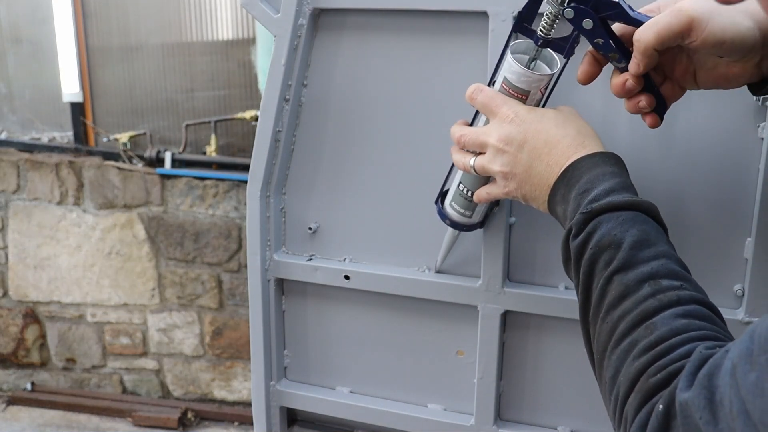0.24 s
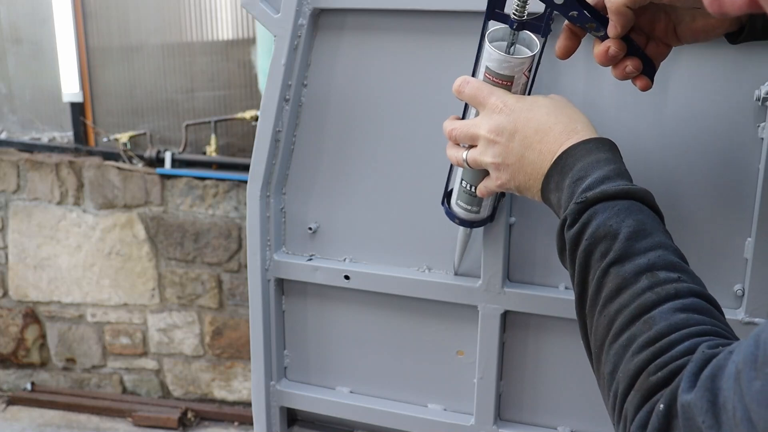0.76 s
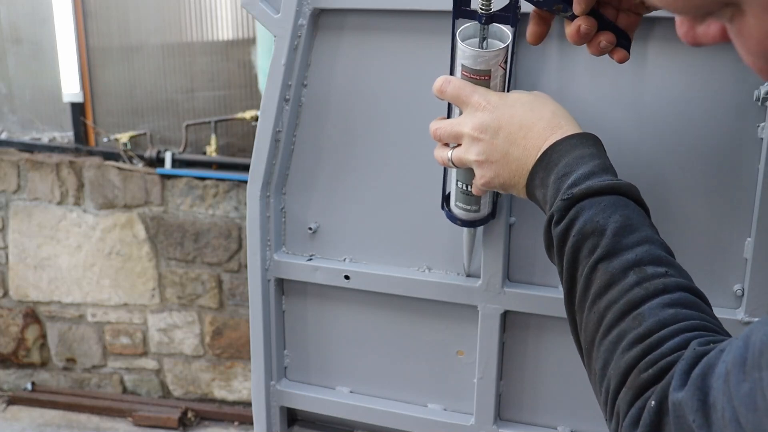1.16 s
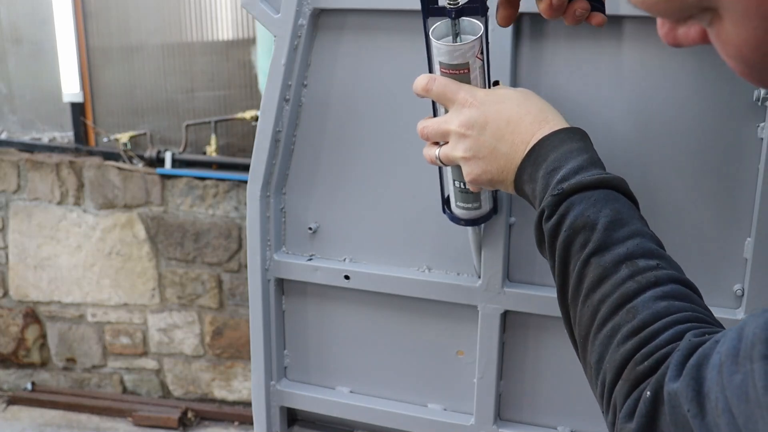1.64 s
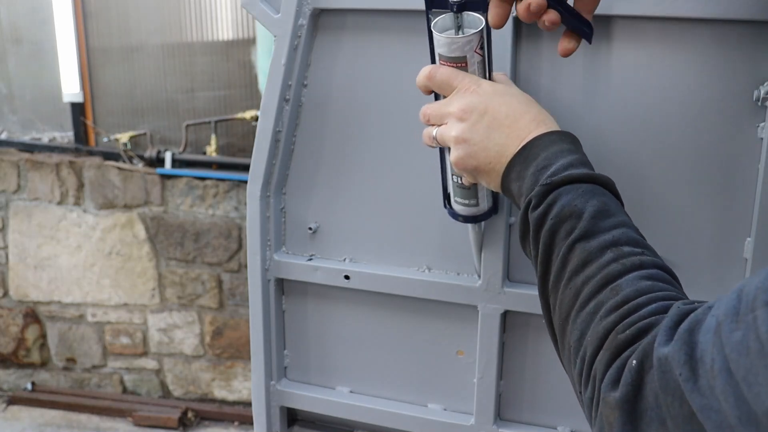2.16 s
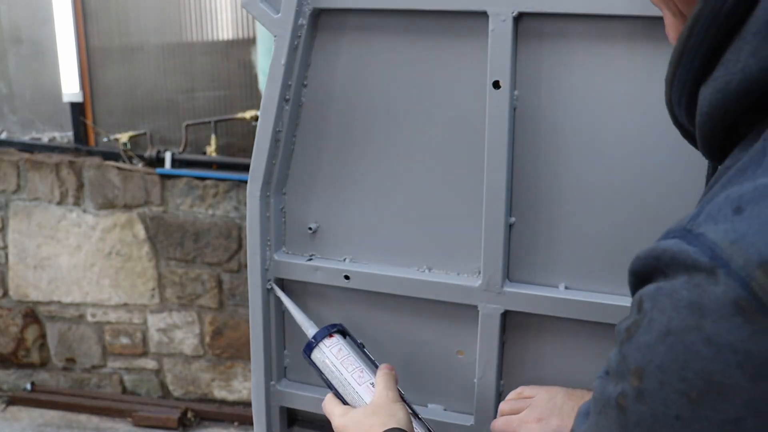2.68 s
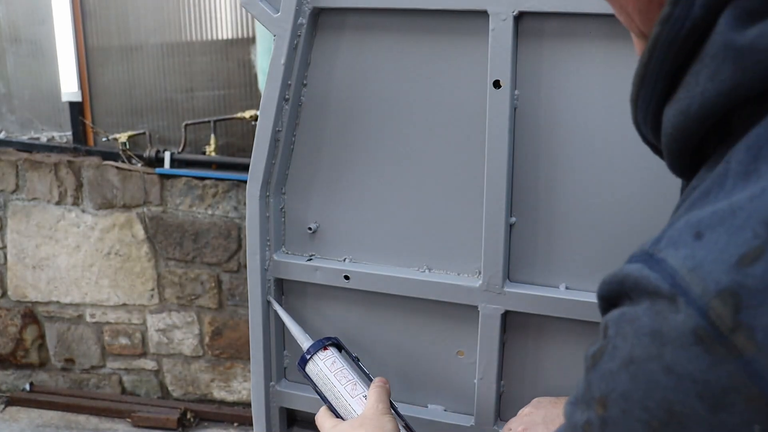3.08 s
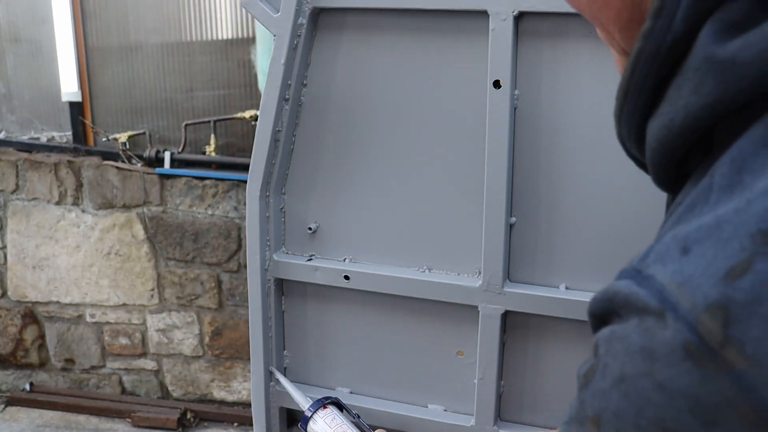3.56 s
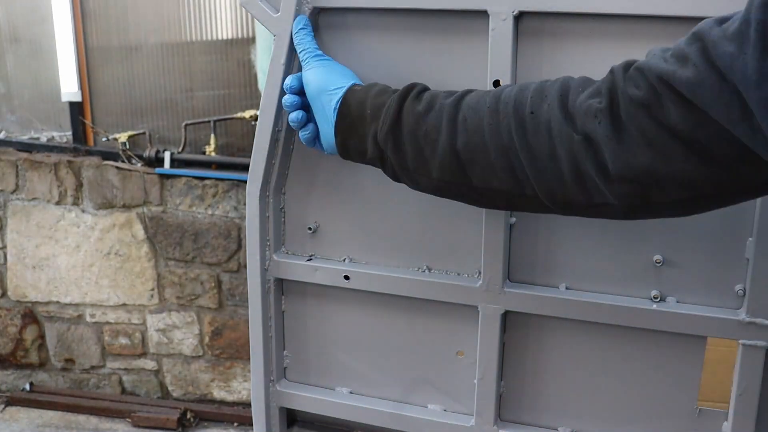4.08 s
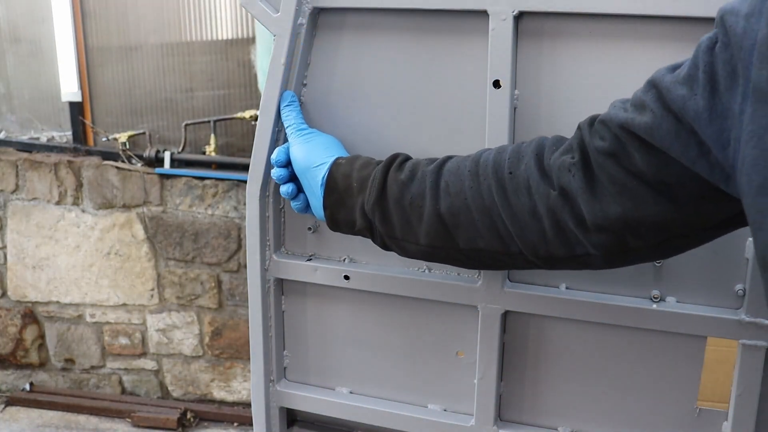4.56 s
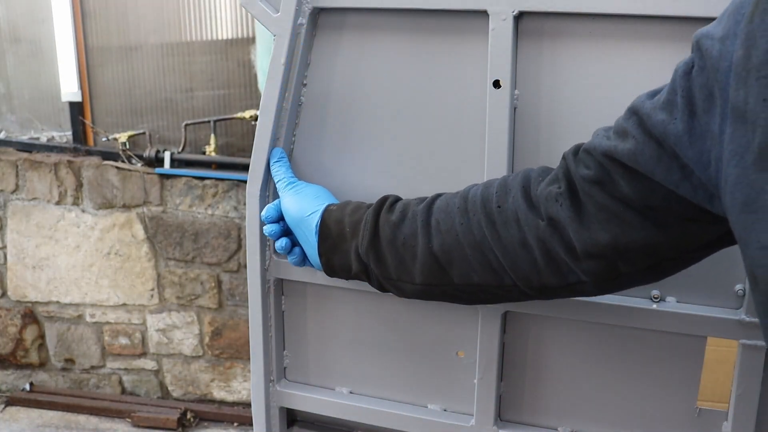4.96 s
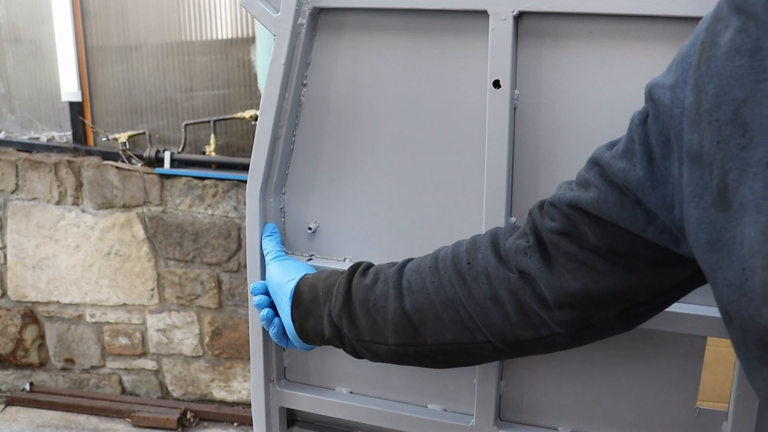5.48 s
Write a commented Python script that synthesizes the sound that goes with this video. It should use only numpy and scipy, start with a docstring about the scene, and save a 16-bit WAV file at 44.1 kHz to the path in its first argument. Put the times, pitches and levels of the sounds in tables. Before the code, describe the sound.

Close to the microphone in a workshop, a caulking gun clicks sharply and bumps a steel panel with short boomy knocks at the start. Sleeve swishes and dull rubbing follow, then a louder cluster of clatter and knocks around two seconds. A quieter stretch leads to a brief run of clicks, and finally soft rustles and tiny squeaky glove scrapes. A faint breathy fan whine and low rumble continue throughout.

```python
"""In a workshop, a caulking gun lays sealer along the seams of a painted steel panel, close to the microphone.
Contact noise rings the gun's frame, cartridge and struck parts; knocks of the nozzle ring the panel's modes.
A gloved thumb catches in short scrapes of resonant noise; a sleeve rustles and a hand rubs as shaped noise.
Behind them a fan's faint, breathy whine is noise around a broad resonance, over a low rumble."""
import sys
import numpy as np
from scipy import signal
from scipy.fft import rfft, irfft
from scipy.io import wavfile
from scipy.ndimage import uniform_filter1d

SR = 44100
rng = np.random.default_rng(int(sys.argv[2]) if len(sys.argv) > 2 else 0)


def generate_wav(sig):
    """Save sig (samples, or channels by samples) to the path in sys.argv[1] as 16-bit PCM at SR."""
    pcm = np.round(np.clip(np.atleast_2d(sig).T, -1, 1) * 32767).astype(np.int16)
    wavfile.write(sys.argv[1], SR, pcm)


N = 252252
TIME = np.arange(N) / SR  # s
HIT_TIME = TIME[:SR // 3]  # time axis of one short sound, s
TOP_HZ = 15800  # upper band limit


def amp(db):
    """Logarithmic level: decibels become an amplitude gain."""
    return 10 ** (np.asarray(db) / 20)


def unit(x):
    """Normalisation: scale to an rms of one."""
    return x / np.sqrt(np.mean(x ** 2))


def burst(x, db):
    """Sound exposure: give a short sound the energy of 10 ms at this level."""
    return x * amp(db) * np.sqrt(SR / 100 / np.sum(x ** 2))


def curve(table):
    """Linear interpolation: join (t/s, level/dB) points by straight lines."""
    t, level_db = np.transpose(table)
    return np.interp(TIME, t, level_db)


def colour(x, spectrum):
    """Spectral shaping: filter by (f/Hz, level/dB) points, to an rms of one."""
    hz, db = np.transpose(spectrum)
    f = np.maximum(np.fft.rfftfreq(len(x), 1 / SR), 1)
    gain = amp(np.interp(np.log(f), np.log(hz), db))
    return unit(irfft(rfft(x) * gain, len(x)))


def noise():
    """White noise: equal mean power at every frequency."""
    return rng.standard_normal(N)


def walk(rate):
    """Random modulation: smooth chance of rms one, with a new target rate times a second."""
    k = int(SR / rate)
    steps = np.repeat(rng.standard_normal(N // k + 1), k)
    return unit(uniform_filter1d(steps, k)[:N])


def resonate(x, hz, width):
    """Resonance: one damped mode of a given bandwidth driven by x, at an rms of one."""
    return unit(signal.lfilter(*signal.iirpeak(hz, hz / width, fs=SR), x))


def rung(force, modes):
    """Modal superposition: one force drives all modes; neighbours have opposite signs."""
    total = 0
    for k, (hz, width, db) in enumerate(modes):
        total = total + amp(db) * (-1) ** k * resonate(force, hz, width)
    return unit(total)


def lowpass(x, hz, order=2):
    """Low-pass filtering: attenuate what lies above hz."""
    return signal.sosfilt(signal.butter(order, hz, fs=SR, output="sos"), x)


def contact(length_s, fall_s):
    """Rough contact: a random force builds, holds, then decays exponentially."""
    build = np.minimum(3 * HIT_TIME / length_s, 1)
    release = np.exp(-np.maximum(HIT_TIME - length_s, 0) / fall_s)
    return rng.standard_normal(len(HIT_TIME)) * build * release


def chatter(length_s, fall_s, count=6):
    """Broadband excitation: a flurry of hard impacts, flattened in spectrum and faded count times."""
    force = contact(length_s, fall_s)
    fade = np.exp(-np.maximum(HIT_TIME - length_s - 2 * fall_s, 0) / fall_s)
    for _ in range(count):
        phase = np.angle(rfft(force))
        force = irfft(np.exp(1j * phase), len(force)) * fade
    return force


def add(track, s, sound):
    """Linear superposition: mix a sound into the track at time s."""
    i = max(int(s * SR), 0)
    track[i:i + len(sound)] += sound[:N - i]


# slowly drifting whine of the fan: t/s, level/dB before its random flutter
FAN_LEVEL = [(0, -34.5), (.9, -36), (1.7, -36), (2.7, -37), (3.95, -41.5), (4.35, -39.5), (5.72, -39)]
# broad resonance of the moving air: f/Hz, relative level/dB per Hz
WHINE_SPECTRUM = [(500, -25.5), (700, -13.5), (800, -6), (900, -2), (980, -4.5), (1100, -11), (1400, -16),
                  (2000, -24), (4000, -51)]
# low rumble of the shop: f/Hz, relative level/dB per Hz
RUMBLE_SPECTRUM = [(15, -10), (40, -2.5), (130, 1), (500, -2), (1500, -8.5), (3000, -14.5), (6000, -45),
                   (16000, -54)]


def fan(flutter_db=0.65, flutter_hz=8.2, rumble_db=-45):
    """Flow-excited resonance: moving air rings a broad resonance, over the low rumble of the shop."""
    air = colour(noise(), WHINE_SPECTRUM)
    whine = air * amp(curve(FAN_LEVEL) + flutter_db * walk(flutter_hz))
    rumble = amp(rumble_db) * colour(noise(), RUMBLE_SPECTRUM)
    return whine + rumble


# how hard the hands work along the seam: t/s, level/dB of their rub before its unevenness
EFFORT = [(0, -40), (1.2, -41), (1.75, -44), (2.25, -40), (2.8, -41.5), (3.45, -46.5), (4.0, -47),
          (4.27, -44), (4.6, -44), (5.25, -39.5), (5.72, -40.5)]
# dull friction on steel: f/Hz, relative level/dB per Hz
RUB_SPECTRUM = [(30, -5), (100, -2.5), (180, -2.5), (320, -1), (500, -8), (700, -8.5), (1200, -19),
                (3000, -43.5)]


def hand(uneven_db=1.1, uneven_hz=19):
    """Sliding friction: hand and nozzle drag along the steel with a dull, uneven rub."""
    friction = colour(noise(), RUB_SPECTRUM)
    return friction * amp(curve(EFFORT) + uneven_db * walk(uneven_hz))


# swishes of the sleeve, one per move of the arm: middle t/s, level/dB before the cloth gain,
# length above half power/s
SWISHES = [(0.245, -47.5, 0.037), (.39, -45.5, 0.093), (.575, -46, 0.077), (0.66, -43.5, 0.025),
           (0.72, -52, .04), (0.852, -60, .05), (1.02, -45.5, 0.1), (1.221, -38.5, 0.036),
           (1.27, -41.5, .08), (1.385, -52, .08), (1.63, -49.5, 0.04), (2, -43, 0.063), (2.418, -45, 0.045),
           (2.556, -41, 0.098), (2.644, -44, 0.047), (2.728, -46, 0.048), (2.917, -43, 0.082),
           (4.814, -48, .13), (5.008, -45, 0.075), (5.117, -50, 0.061), (5.363, -48.5, 0.097),
           (5.47, -43, 0.06), (5.65, -48, 0.15)]


def arm(creep_db=-51.5, creep_growth=1.1, usual_effort_db=-42):
    """Power addition: the cloth creeps as the hands work (EFFORT) and swells with each swish; level in dB."""
    creep = amp(creep_db + creep_growth * (curve(EFFORT) - usual_effort_db))
    power = creep ** 2
    for middle_s, db, length_s in SWISHES:
        swell = np.exp2(-(2 * (TIME - middle_s) / length_s) ** 2)  # the arm speeds up and slows down
        power = power + amp(db) ** 2 * swell
    return 10 * np.log10(power)


# rustle of the cloth: f/Hz, relative level/dB per Hz
CLOTH_SPECTRUM = [(400, -1), (1000, 1), (1500, 1), (2200, -1.5), (2900, -1), (3500, 2), (4300, -2.5),
                  (5100, -2), (6500, -9.5), (9000, -13.5), (16000, -27)]
# bright hiss of the cloth: f/Hz, relative level/dB per Hz
HISS_SPECTRUM = [(3000, -30), (6000, 5), (8000, 3.5), (10000, 2), (12500, 5.5), (16000, 1)]


def sleeve(cloth_gain_db=2.5, hiss_db=-53.5, hiss_growth=1.17, usual_swish_db=-45.5,
           grain_db=1.5, flutter_db=1.03):
    """Stick-slip friction: countless fibres catch and slip; faster cloth hisses more brightly."""
    motion_db = arm()
    slips = amp(grain_db * walk(900) + flutter_db * walk(35))
    rustle = colour(noise() * slips, CLOTH_SPECTRUM) * amp(motion_db + cloth_gain_db)
    hiss_level_db = hiss_db + hiss_growth * (motion_db - usual_swish_db)
    hiss = colour(noise() * slips, HISS_SPECTRUM) * amp(hiss_level_db)
    return rustle + hiss


# the gloved thumb catching as it smooths the bead: t/s, level/dB (energy of 10 ms), length/s, f/Hz
SCRAPES = [(5.305, -40.5, 0.02, 3600), (5.377, -39, 0.011, 3630), (5.438, -44, 0.0077, 3400),
           (5.476, -44.5, 0.0044, 5300), (5.602, -48, .012, 4600), (5.672, -40, 0.012, 2540)]


def thumb(width_hz=700, fall_s=0.0043):
    """Stick-slip resonance: rubber catches on the painted edge in short, gritty scrapes."""
    out = np.zeros(N)
    for s, db, length_s, hz in SCRAPES:
        scrape = resonate(contact(length_s, fall_s), hz, width_hz)
        add(out, s, burst(scrape, db))
    return out


# knocks on the panel: t/s, level/dB (energy of 10 ms), contact time scale/s,
# hardness as the corner of the drive f/Hz, boom of the lowest modes/dB
KNOCKS = [(0.042, -18.5, 0.0086, 470, -3), (0.108, -23, 0.015, 450, 11), (0.141, -18, 0.023, 500, 7.5),
          (0.3788, -19.5, 0.002, 800, 8.5), (0.656, -26.5, 0.012, 523, 0), (1.065, -31.5, 0.0054, 450, 7),
          (1.2584, -29, 0.0093, 480, 9), (1.8635, -20.5, 0.023, 464, 5), (2.1808, -19, 0.0039, 440, 6),
          (2.2217, -14.5, 0.0033, 3800, 0), (2.239, -18, 0.0081, 1500, -18), (2.28, -26, 0.044, 477, 4)]
# modes of the ribbed panel: f/Hz, bandwidth/Hz, relative level/dB before hardness and boom
PANEL_MODES = [(126, 15, -22), (156.3, 8.3, -5.5), (197, 29, 1), (232, 6.4, -9.5), (331, 3.3, -5),
               (358.4, 12.5, 5.5), (406, 13, -0.5), (477, 29, 4), (516, 23, -5), (619, 77, -1.5),
               (783, 8.7, -3), (861, 22, 7.5), (946, 120, -2), (1142, 57, 1.5), (1316, 140, -2.5),
               (1620, 190, -24), (2000, 160, -9), (3650, 83, 1), (5030, 270, 0)]


def panel(shudder_db=-14, shudder_s=0.025, boom_hz=260, blow_db=-1, blow_s=0.00059):
    """Modal excitation: the nozzle bumps the panel, which shudders; soft contact favours low modes."""
    out = np.zeros(N)
    blow = np.exp(-HIT_TIME / blow_s)
    for s, db, contact_s, hard_hz, boom_db in KNOCKS:
        ring = 0
        for hz, width, mode_db in PANEL_MODES:
            # a firm blow starts the mode; sliding contact keeps it going
            slide = contact(contact_s / 2, contact_s)
            shudder = amp(shudder_db) * contact(contact_s, shudder_s)
            cutoff = min(2 * hz, TOP_HZ)
            struck = resonate(lowpass(blow, cutoff), hz, width)
            rubbed = resonate(lowpass(slide + shudder, cutoff), hz, width)
            mode = unit(amp(blow_db) * rng.choice([-1, 1]) * struck + rubbed)
            softness = np.hypot(1, (hz / hard_hz) ** 2)
            ring = ring + amp(mode_db + boom_db * (hz < boom_hz)) / softness * mode
        add(out, s, burst(ring, db))
    return out


# clicks and scrapes of the gun: t/s, level/dB (energy of 10 ms), contact time scale/s,
# struck part f/Hz, its ring/dB re frame, treble tilt/dB at the band limit, cartridge ring/dB re frame
CLICKS = [(0.0988, -16, 0.0025, 3150, -7.5, -2, -16.5), (0.174, -50, .002, 4700, -6, -5, -15),
          (1.8554, -29.5, 0.0082, 3750, -5, -13, -5.5), (1.964, -27.5, 0.014, 7400, 0, 16, -19),
          (1.977, -32.5, 0.015, 7480, -4, 9, -20), (2.018, -40.5, 0.014, 5200, -6, 0, -15),
          (2.1755, -17.5, .0048, 4800, -2.5, 2.5, -3), (2.221, -23.5, 0.014, 2700, -15, -13, 6),
          (2.2655, -29, 0.0041, 3250, -18, -21, -7), (2.393, -44, 0.0014, 7660, -26, 1, -13),
          (3.1808, -42.5, 0.0031, 3100, 3, -2, 4), (3.224, -41, 0.0013, 11000, -14, 1, 4),
          (3.2777, -38.5, .002, 2710, 5, -5, -6), (3.7766, -28.5, 0.017, 2180, -6, -8, -13),
          (3.7861, -26.5, 0.0128, 3840, -7, -7, -1.5), (3.7960, -28, 0.0044, 1870, -2, 0, -5),
          (3.7991, -27, 0.00022, 8500, -8, 4, -18), (3.85, -42, 0.0067, 3130, -1, -17, -8),
          (3.897, -47.5, 0.005, 2700, 0, -12, -14), (3.954, -28, .0044, 1810, 1, -7, -3.5),
          (4.022, -48, .012, 3500, -4, -5, -12)]
# modes of the gun's steel frame and rod: f/Hz, bandwidth/Hz, relative level/dB
FRAME_MODES = [(2070, 110, -6), (2385, 210, -0.5), (2765, 230, 0.5), (2966, 170, 1.5), (3670, 360, 3.5),
               (4540, 96, -6), (5050, 130, -6.5), (5670, 170, -1.5), (6250, 130, -6), (7530, 1100, -4),
               (8200, 130, -8), (9030, 590, -6.5), (10300, 220, -10.5), (11030, 160, -13.5),
               (12570, 280, -12), (14500, 900, -15)]
# hollow modes of the plastic cartridge: f/Hz, bandwidth/Hz, relative level/dB
CARTRIDGE_MODES = [(516, 270, -10), (960, 660, -3), (1136, 230, -0.5), (1876, 150, -15)]


def gun(part_width_hz=150, treble_hz=6000, crack_db=-14, crack_hz=8000):
    """Impact excitation: trigger, catch plate and rod chatter, ringing frame, cartridge and struck part."""
    out = np.zeros(N)
    lead = SR // 300  # room for the shaping filter to spread ahead of the click, samples
    for s, db, contact_s, part_hz, part_db, treble_db, tube_db in CLICKS:
        length_s, fall_s = contact_s * 0.7, contact_s * 0.23
        frame = rung(chatter(length_s, fall_s), FRAME_MODES)
        tube = amp(tube_db) * rung(chatter(length_s, fall_s), CARTRIDGE_MODES)
        part = amp(part_db) * resonate(chatter(length_s, fall_s), part_hz, part_width_hz)
        crack = amp(crack_db) * unit(lowpass(chatter(length_s, fall_s), crack_hz, order=1))
        click = np.pad(frame + tube + part + crack, (lead, 0))
        # bare steel on steel is bright, steel on plastic is dull
        click = colour(click, [(treble_hz, 0), (TOP_HZ, treble_db)])
        add(out, s - lead / SR, burst(click, db))
    return out


def decaying_echoes(t60, db):
    """Diffuse decay: random echoes fall by 60 dB in t60 seconds, after a 2 ms gap."""
    echoes = rng.standard_normal(len(HIT_TIME)) * amp(-60 * HIT_TIME / t60) * (HIT_TIME > 0.002)
    return amp(db) * echoes / np.linalg.norm(echoes)


def workshop(x, near_db=-13, near_t60=0.069, far_db=-23, far_t60=0.15):
    """Reverberation: quick reflections from panel and body, and a fainter, duller tail from stone walls."""
    near = decaying_echoes(near_t60, near_db)
    far = lowpass(decaying_echoes(far_t60, far_db), 6900)
    return x + signal.fftconvolve(x, near + far)[:N]


def scene():
    """Superposition: gun, panel and thumb excite the room; sleeve, hand and fan join them unreflected."""
    work = workshop(gun() + panel() + thumb())
    return (work + sleeve() + hand() + fan())[None]


def record(dry, ceiling=1.3):
    """Soft saturation and band limiting: round the sharpest peaks and cut the top of the treble."""
    rounded = ceiling * np.tanh(dry / ceiling)
    return signal.sosfilt(signal.ellip(12, 0.1, 90, TOP_HZ, fs=SR, output="sos"), rounded)


dry = scene()
out = record(dry)
generate_wav(out)
```